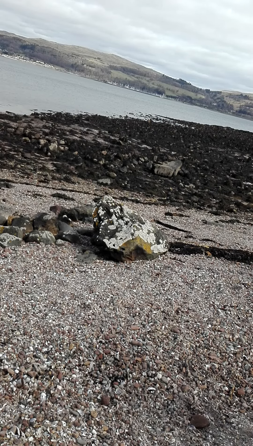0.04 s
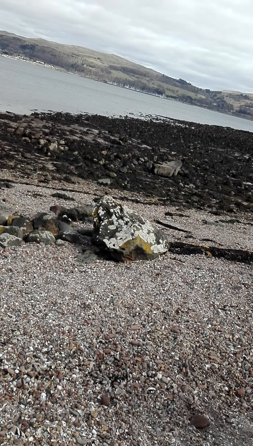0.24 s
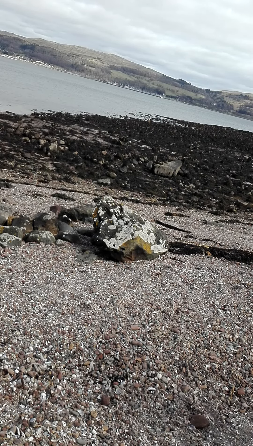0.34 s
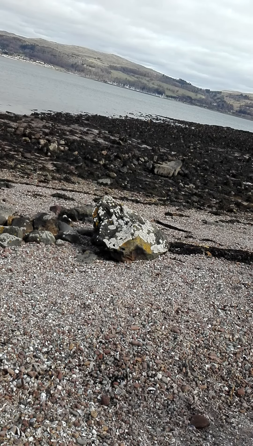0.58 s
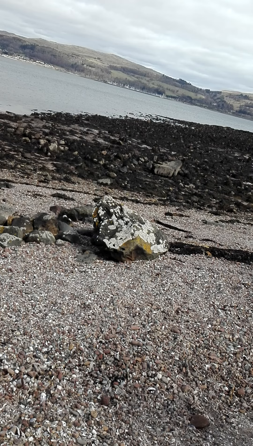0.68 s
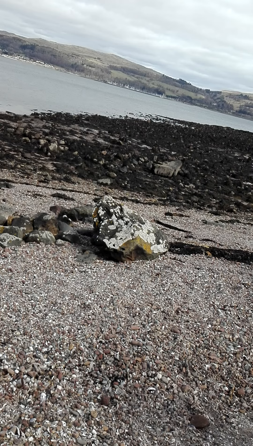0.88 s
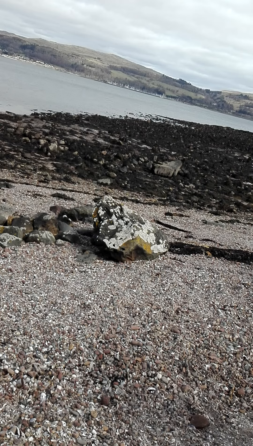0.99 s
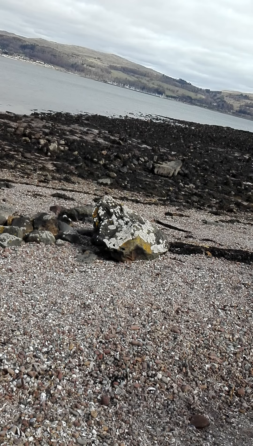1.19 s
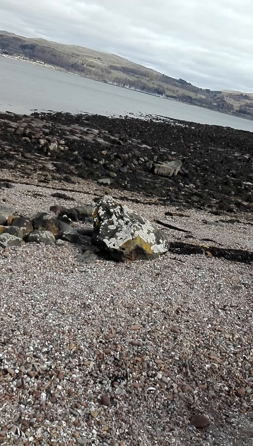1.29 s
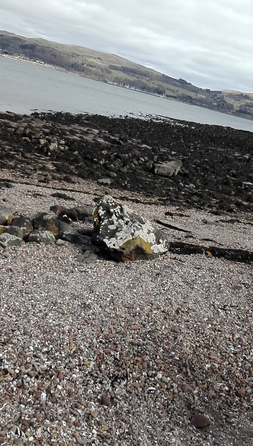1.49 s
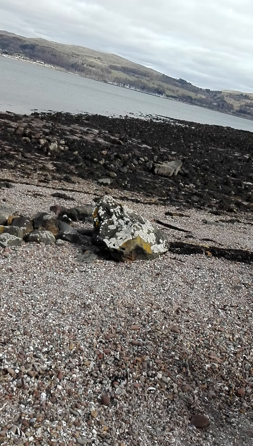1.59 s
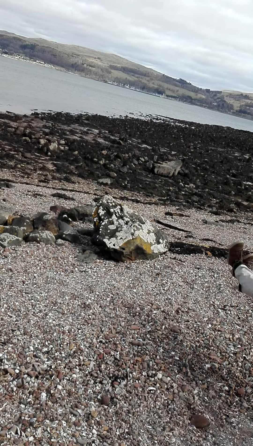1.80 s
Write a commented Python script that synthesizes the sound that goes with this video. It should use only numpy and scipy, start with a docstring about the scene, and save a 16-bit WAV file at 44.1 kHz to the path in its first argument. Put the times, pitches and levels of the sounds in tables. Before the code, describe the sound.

Four short, hoarse, fairly high dog barks sound across a stony shore: one loud, two close together, then one more. One pebble click follows the first, while faint wind brushes the microphone.

```python
"""A dog barking on a pebble shore

A dog barks four times. Each bark rises and falls in pitch: it is hoarse as the mouth opens wide, clears
as the mouth begins to close and sinks into a small whine. The vocal folds make the tone, and rushing
breath adds rasp and hiss. The stones scatter the sound and the shore echoes it faintly. Light wind
rumbles on the microphone, and a pebble clicks against another."""
import sys
import numpy as np
from scipy import signal
from scipy.fft import rfft, irfft
from scipy.io import wavfile
from scipy.ndimage import uniform_filter1d, minimum_filter1d, map_coordinates

SR = 44100
rng = np.random.default_rng(int(sys.argv[2]) if len(sys.argv) > 2 else 0)


def unload_wav(signal):
    """Save mono or channel-first audio to the path in sys.argv[1] as 16-bit WAV at rate SR, clipped to [-1, 1]."""
    wavfile.write(
        sys.argv[1],
        SR,
        np.round(np.clip(np.atleast_2d(signal).T, -1, 1) * 32767).astype(np.int16),
    )


N = 81585
T = np.arange(N) / SR
BREATH_PULSING = .5  # how deeply the breath pulses with each swing of the vocal folds


def undb(db):
    """Turn decibels into a number to multiply by."""
    return 10 ** (np.asarray(db) / 20)


def gain_at(colour, hz):
    """Read the gain at each frequency from a curve of (frequency [Hz], level [dB]) points."""
    points_hz, db = np.array(colour, float).T
    return undb(np.interp(np.log(np.maximum(hz, 1)), np.log(points_hz), db))


def unit(x):
    """Scale a sound so that its average power is 1."""
    return x / np.sqrt(np.mean(x ** 2))


def noise(colour, size):
    """Noise of power 1, coloured by (frequency [Hz], relative level [dB]) points."""
    spectrum = rfft(rng.standard_normal(size))
    return unit(irfft(spectrum * gain_at(colour, np.fft.rfftfreq(size, 1 / SR)), size))


def wobble(rate, size):
    """A smooth random curve that strays by about 1 and changes about `rate` times a second."""
    samples_per_step = max(int(SR / rate), 2)
    steps = rng.standard_normal(4096)
    return 1.166 * map_coordinates(steps, [np.arange(size) / samples_per_step], order=3, mode="mirror")


def wind():
    """Light gusts flutter and rumble on the microphone over a faint steady hiss."""
    # strength of the gusts: (time [s], level [dB])
    gusts = [(0, -56.5), (.06, -45.5), (.33, -46), (.43, -60), (.55, -54), (1.19, -50), (1.3, -63),
             (1.56, -61), (1.66, -73.5)]
    # colour of the rumble: (frequency [Hz], relative level [dB])
    rumble_colour = [(60, -0.5), (250, -9), (450, -34.5), (1900, -34), (3000, -51)]
    level_db = np.interp(T, *np.array(gusts).T) + 2 * wobble(56, N)
    rumble = undb(level_db) * noise(rumble_colour, N)
    return rumble + undb(-85) * noise([(2000, -5.5), (14000, -17.5)], N)


def pebble(tick_s=.00035, knock_s=.0015):
    """Stone hits stone: a sharp tick with a dull knock under it, both dying away fast."""
    size = SR // 20
    t = T[:size]
    tick = noise([(8000, 3.5), (15000, -32.5)], size) * np.exp(-t / tick_s)
    dull_stereo = [noise([(700, -2.5), (2500, -33), (9000, -45.5)], size) for _ in range(2)]
    knock = dull_stereo * np.exp(-t / knock_s)
    return tick + undb(.5) * knock


def reflections(start_s, fade_s):
    """Many tiny echoes that begin at start_s and fall by 60 dB over fade_s."""
    fade = (T > start_s) * undb(-60 * np.maximum(T - start_s, 0) / fade_s)
    tail = rng.standard_normal(N) * fade
    return tail / np.sqrt(np.sum(tail ** 2))


def shore(sound, echo_hz=1080):
    """Add quick scatter from the stones, then a faint echo from the rocks, strongest near echo_hz."""
    echo_band = signal.iirpeak(echo_hz, 2, fs=SR)
    echo = signal.lfilter(*echo_band, reflections(start_s=.24, fade_s=.12))
    scatter = reflections(start_s=.013, fade_s=.084)
    response = undb(-17.5) * scatter + undb(-57) * echo
    return sound + signal.fftconvolve(sound, response[None], axes=1)[:, :N]


def mouth(hz, cutoff_hz, steepness=11.5):
    """The mouth lets through a band of frequencies; both edges of the band rise as it opens."""
    low_edge_hz = .29 * cutoff_hz
    low_cut = 1 + (low_edge_hz / hz) ** 8
    high_cut = 1 + (hz / cutoff_hz) ** (2 * steepness)
    return 1 / np.sqrt(low_cut * high_cut)


def hiss(t, pitch_hz, phase, cutoff_hz):
    """Breath and high overtones ring in rising bands over a broad hiss; t is 0 at the loudest part."""
    # high resonances of the voice: (centre at t = 0 [Hz], width [Hz], relative level [dB], rise [oct/s])
    resonances = [(4038, 330, 0, 3.6), (4800, 650, -1, 0.91), (6890, 700, -9, 2.2), (10370, 3700, -19, .5)]
    size, bands = len(t), 0
    opening = cutoff_hz / 2000  # above 1 when the mouth is wide open
    for middle_hz, width_hz, db, rise in resonances:
        centre_hz = middle_hz * 2 ** (rise * np.clip(t, -.07, .07))
        turn = 2 * np.pi * np.cumsum(centre_hz) / SR
        air = wobble(width_hz, size) * np.cos(turn) + wobble(width_hz, size) * np.sin(turn)
        ring = 0
        for k in range(4, 18):  # an overtone rings most when it is near the centre
            distance = 2 * (k * pitch_hz - centre_hz) / width_hz
            ring = ring + np.sin(k * phase + rng.uniform(0, 2 * np.pi)) / (1 + distance ** 2)
        brightness = opening ** (middle_hz / 5950)  # a closing mouth dulls the highest bands most
        bands = bands + undb(db) * (air / np.sqrt(2) + undb(1.5) * ring) * brightness
    broad_colour = [(3000, -3.5), (5500, 3.5), (8200, -12.0), (14500, -21.5)]
    middle = undb(-5) * noise(broad_colour, size)
    sides = undb(-35) * noise(broad_colour, size) * np.array([[1], [-1]])  # opposite in left and right
    broad = (middle + sides) * opening ** 2
    return (bands + broad) * unit(1 + BREATH_PULSING * np.cos(phase))


def rasp(phase, cutoff_hz, band_hz=150):
    """Swirling breath pulses with the vocal folds and passes through the mouth; power about 1."""
    # colour of the rasp before the mouth shapes it: (frequency [Hz], relative level [dB])
    rasp_colour = [(400, -28), (540, -41), (680, -8), (900, -1), (1100, -4.5), (1350, -0.5), (1550, -1.5),
                   (1850, 0.5), (2450, -8), (3500, -2.5)]
    size = len(phase)
    breath = rng.standard_normal(size) * (1 + BREATH_PULSING * np.cos(phase))
    spectrum = rfft(unit(breath))
    hz = np.fft.rfftfreq(size, 1 / SR)
    colour = gain_at(rasp_colour, hz)
    out, power = 0, 1e-18
    for centre_hz in band_hz * np.arange(1, 28):  # the moving mouth turns each band up and down
        band = np.maximum(1 - abs(hz - centre_hz) / band_hz, 0) * colour
        gain = mouth(centre_hz, cutoff_hz)
        out = out + gain * irfft(spectrum * band, size)
        power = power + gain ** 2 * np.mean(band * colour)
    return out / np.sqrt(power)


def voice(multiples, pitch_hz, phase, cutoff_hz, phase_wander):
    """The vocal folds make tones at multiples of the pitch, shaped by throat and mouth; power about 1."""
    # resonances of the throat: (frequency [Hz], relative level [dB])
    throat = [(340, -1), (480, -21), (570, -14), (680, -10.5), (790, -8), (950, 0), (1130, -17),
              (1330, 1.5), (1450, -9), (1650, 1.5), (2020, -2.5), (2300, -6.5)]
    size, out, power = len(pitch_hz), 0, 1e-18
    for k in multiples:
        rolloff = undb(-12 * np.log2(max(k / 2, 1)))  # 12 dB less per octave above twice the pitch
        gain = gain_at(throat, k * pitch_hz) * mouth(k * pitch_hz, cutoff_hz) * rolloff
        gain = gain * (.12 if k < 1 else 1)  # a tone below the pitch is faint
        drift = phase_wander * wobble(150, size) + rng.uniform(0, 2 * np.pi)
        flicker = undb(min(k, 2) * wobble(118.8, size))
        out = out + gain * flicker * np.sin(k * phase + drift)
        power = power + gain ** 2 / 2
    return out / np.sqrt(power)


def bark(rows):
    """One bark: a clear tone from the vocal folds, a rough layer that makes it hoarse, and hiss."""
    times, *curves = np.array(rows, float).T
    size = SR // 2
    t = times[0] + np.arange(size) / SR
    pitch_hz, clear_db, rough_db, cutoff_hz = (np.interp(t, times, curve) for curve in curves)
    hoarseness = undb(rough_db) / (undb(rough_db) + undb(clear_db))
    jitter = .004 * (1 + 2 * hoarseness) * wobble(400, size)  # a hoarse voice has a shakier pitch
    phase = 2 * np.pi * np.cumsum(pitch_hz * (1 + jitter)) / SR
    clear = voice(np.arange(1, 10), pitch_hz, phase, cutoff_hz, phase_wander=.032)
    in_between = voice(np.arange(6) + .5, pitch_hz, phase, cutoff_hz, phase_wander=.65)
    rough = undb(-6) * in_between + undb(-2.5) * rasp(phase, cutoff_hz)
    effort = undb(rough_db) + undb(clear_db - 9.5)
    hiss_gain = undb(-22) * effort ** 1.18  # the hiss grows faster than the voice
    loudest_s = np.average(t, weights=hiss_gain ** 2)
    breath = hiss(t - loudest_s, pitch_hz, phase, cutoff_hz)
    fade_in = np.clip((t - times[0]) / .012, 0, 1)
    fade_out = np.exp(-np.maximum(t - times[-1], 0) / .011)
    return fade_in * fade_out * (undb(clear_db) * clear + undb(rough_db) * rough + hiss_gain * breath)


def add(track, sound, start_s):
    """Mix a sound into a stereo track, beginning at start_s."""
    start = max(int(start_s * SR), 0)
    track[:, start:start + sound.shape[-1]] += sound[..., :N - start]


def scene():
    """Four barks and their echoes on the shore, with pebble clicks and wind."""
    # how the voice moves, one list per bark:
    # (time [s], pitch [Hz], clear level [dB], rough level [dB], mouth cut-off [Hz])
    barks = [
        [(.15, 206.2, -82, -44, 1170), (.18, 257.8, -47, -44, 1520), (.205, 423.1, -32, -26.5, 2060),
         (.228, 617.6, -19.5, -11, 2570), (.243, 693.4, -11.5, -11.5, 2140), (.258, 713, -8.5, -7, 2000),
         (.285, 672.5, -4.5, -14.5, 2300), (.314, 694.4, -1.5, -10, 2084), (.338, 790, -15, -15, 1500),
         (.353, 710, -35, -31, 1450), (.385, 620, -42, -42, 1300), (.413, 515, -36, -54, 1250),
         (.455, 340, -73.5, -58, 1242)],
        [(.622, 313.1, -72, -57, 1220), (.64, 432.9, -37.5, -39.5, 1590), (.668, 627.3, -26, -17.5, 2300),
         (.686, 662.3, -16, -18.5, 2230), (.712, 651.3, -14.5, -21, 1890), (.742, 684.5, -14, -33, 1640),
         (.757, 722, -23, -19.5, 1410), (.795, 541.2, -38.5, -35, 1215), (.822, 560, -43, -49, 1300),
         (.837, 475, -38, -51, 1300), (.848, 440, -48, -54, 1300), (.868, 495, -31, -53, 1400),
         (.884, 464.3, -35, -75, 1234), (.897, 369, -47, -56, 1306), (.945, 303, -51.5, -57, 1490)],
        [(.955, 304.2, -62, -79, 1443), (.983, 438.6, -35.5, -61, 1670), (1.001, 624.4, -34, -18.5, 1920),
         (1.025, 675.7, -12.5, -17.5, 1883), (1.05, 643.8, -13.5, -26, 1650), (1.08, 684.4, -21, -24, 1587),
         (1.108, 611.7, -28, -31, 1310), (1.125, 562, -43, -45, 1310), (1.166, 550, -47, -53, 1300),
         (1.177, 485, -35, -50, 1400), (1.205, 365, -49, -54, 1200), (1.228, 310, -72, -68, 1200)],
        [(1.545, 170, -68, -58, 1400), (1.57, 365, -42, -40, 1900), (1.587, 465, -20, -30, 1700),
         (1.603, 575, -28, -24, 2400), (1.632, 700, -19, -23, 2400), (1.657, 676, -18, -25, 2200),
         (1.683, 702, -12, -27, 1800), (1.697, 765, -16, -24, 1650), (1.712, 705, -29, -35, 1550),
         (1.738, 610, -39, -44, 1500), (1.762, 500, -41, -51, 1300), (1.79, 290, -48, -47, 1400),
         (1.83, 228.3, -86.5, -61.5, 1440)],
    ]
    # a pebble's two quick hits: (time [s], level [dB])
    clicks = [(0.3449, -11), (0.3559, -32)]
    dog, stones = np.zeros((2, N)), np.zeros((2, N))
    for rows in barks:
        add(dog, bark(rows), start_s=rows[0][0])
    for start_s, db in clicks:
        add(stones, undb(db) * pebble(), start_s)
    return shore(dog) + stones + wind()


def record(dry, limit=1.2, limit_s=.0024, top_hz=14600):
    """A fast limiter turns down the loudest bark, which still just clips; the highest treble is cut."""
    span = int(limit_s * SR)
    needed_gain = np.minimum(1, limit / (abs(dry).max(axis=0) + 1e-9))
    smooth_gain = uniform_filter1d(minimum_filter1d(needed_gain, span), span)
    clipped = np.clip(dry * smooth_gain, -1, 1)
    treble_cut = signal.ellip(8, .2, 70, top_hz, fs=SR, output="sos")
    return signal.sosfilt(treble_cut, clipped)


dry = scene()
out = record(dry)
unload_wav(out)
```